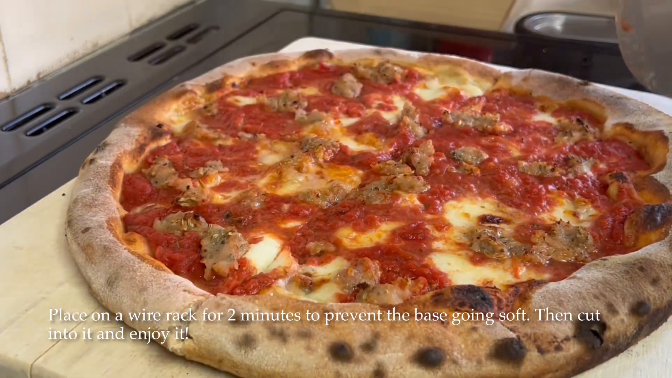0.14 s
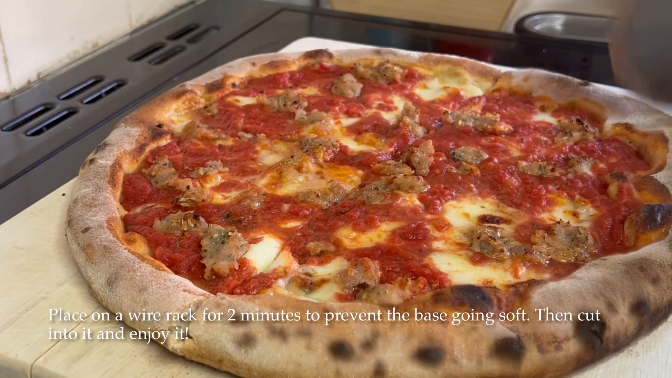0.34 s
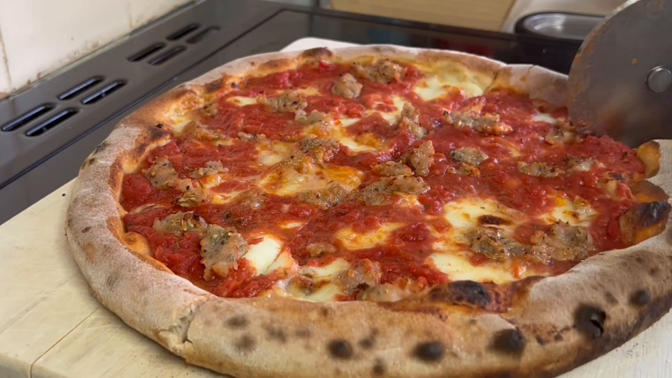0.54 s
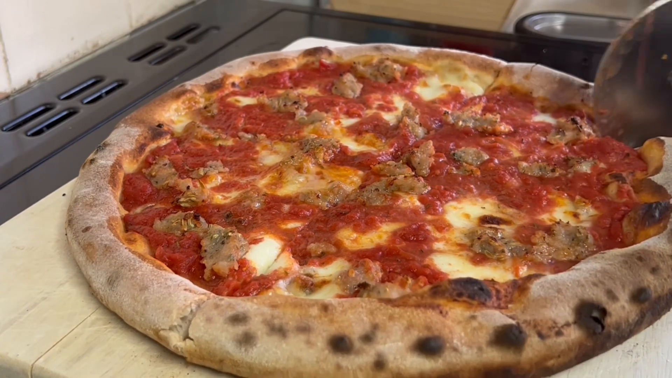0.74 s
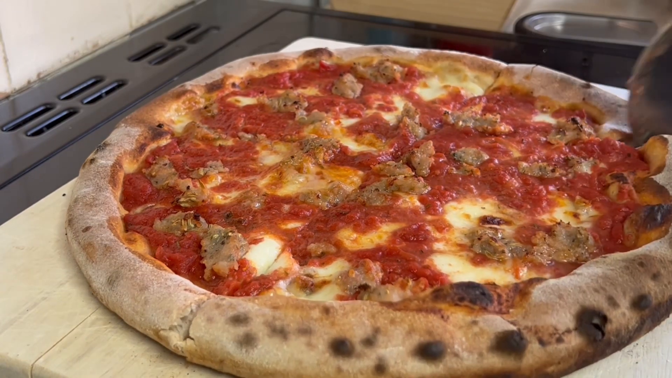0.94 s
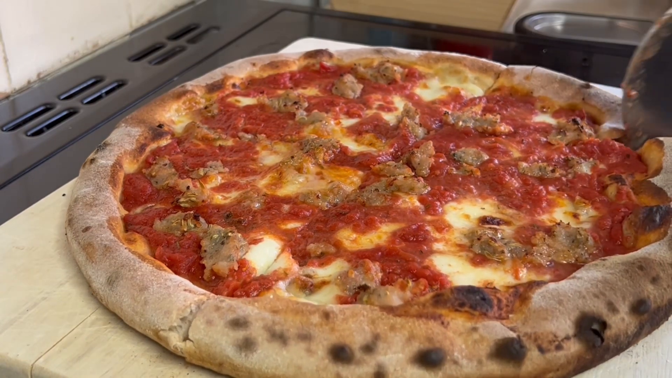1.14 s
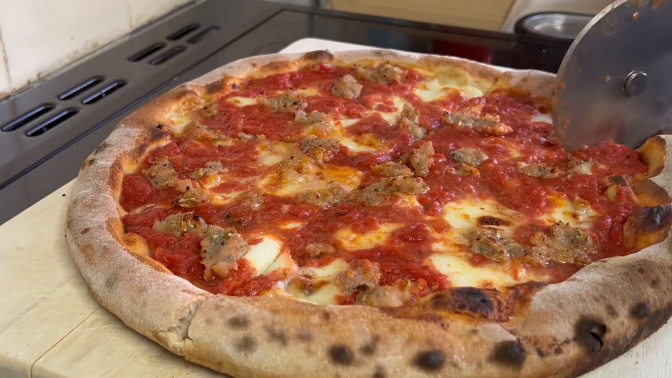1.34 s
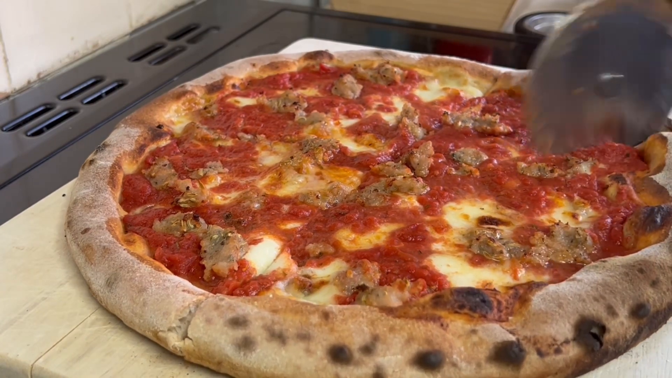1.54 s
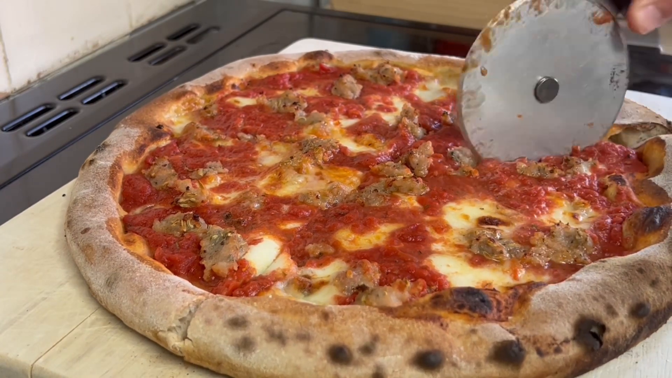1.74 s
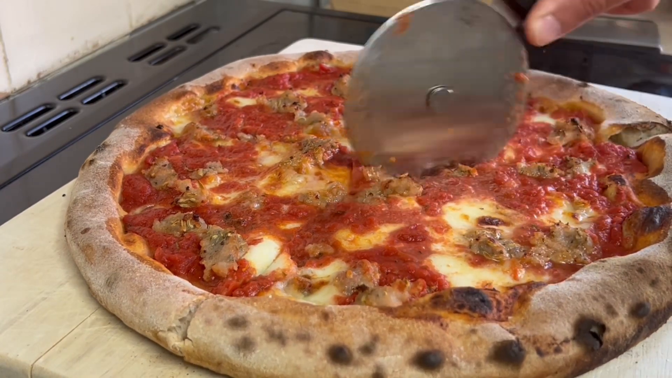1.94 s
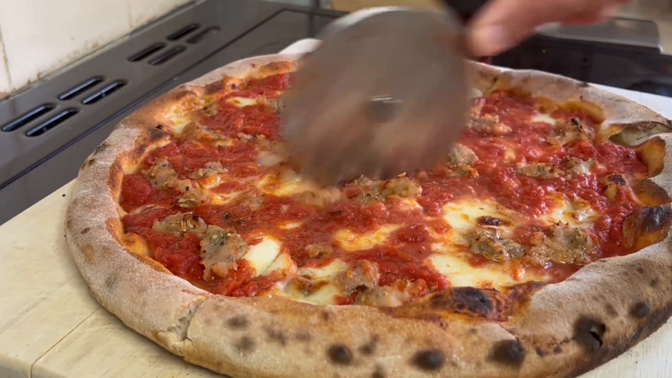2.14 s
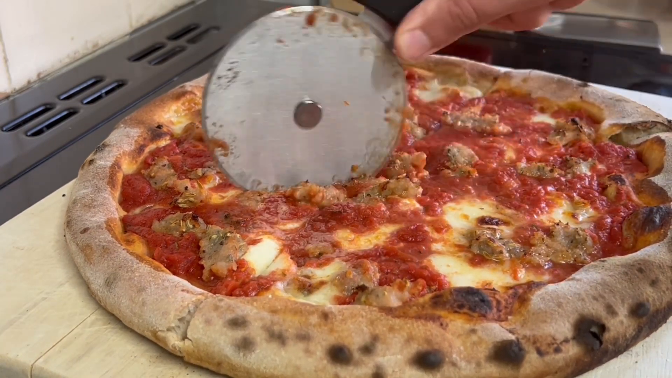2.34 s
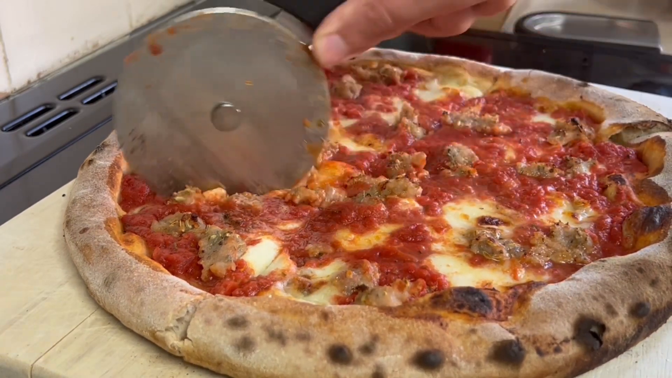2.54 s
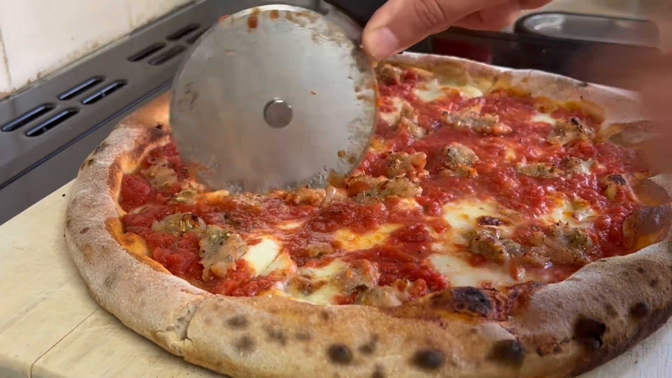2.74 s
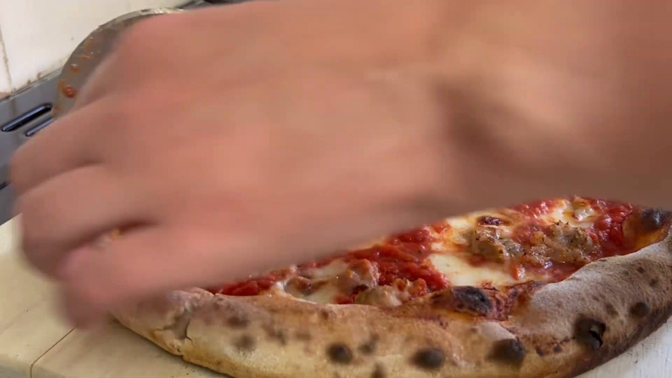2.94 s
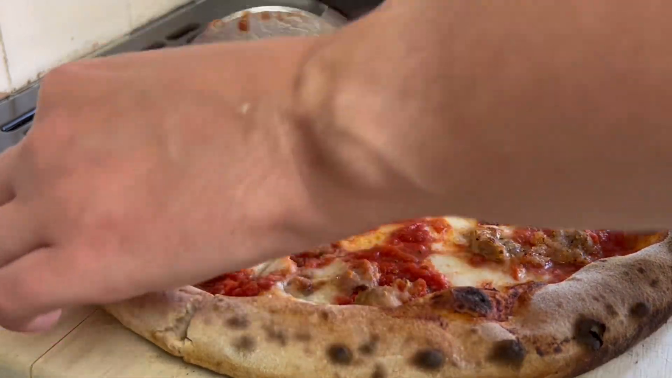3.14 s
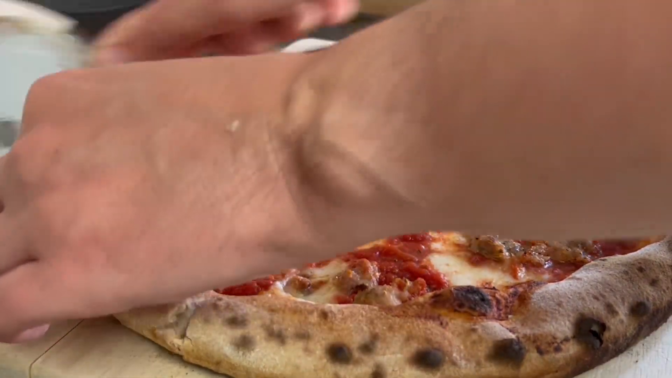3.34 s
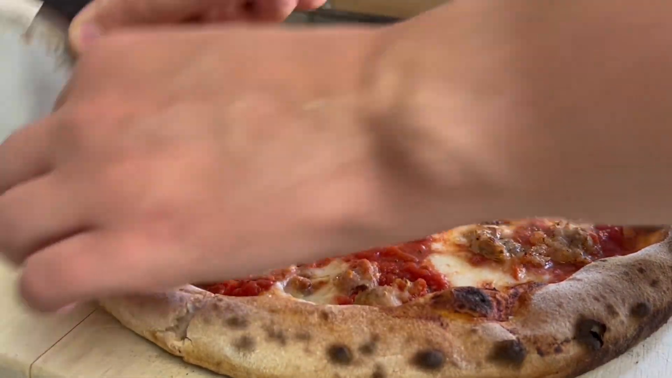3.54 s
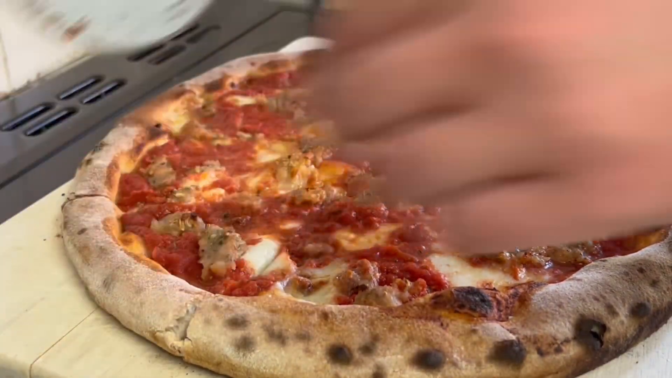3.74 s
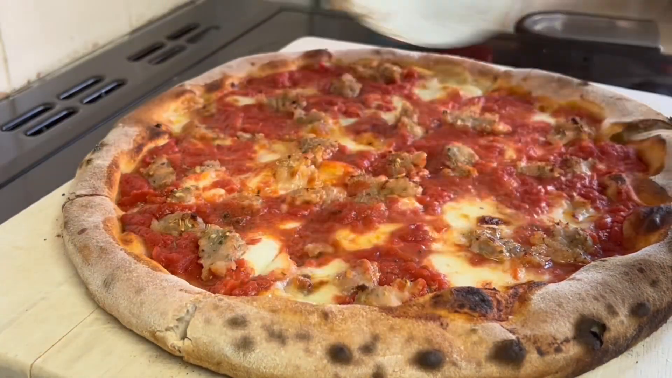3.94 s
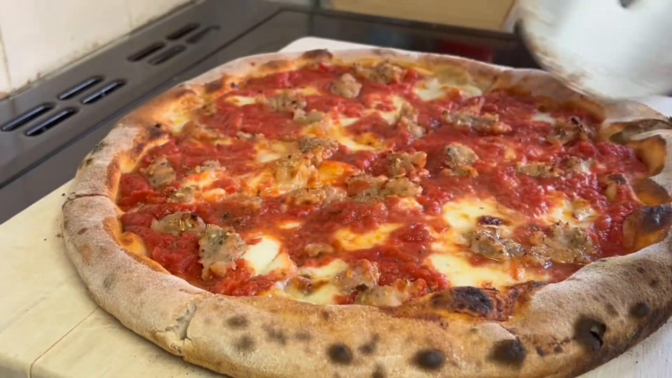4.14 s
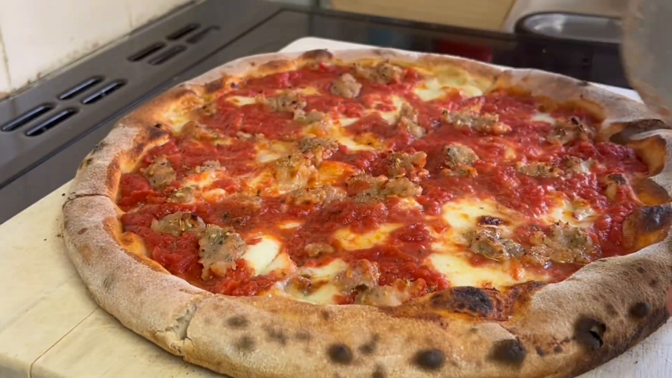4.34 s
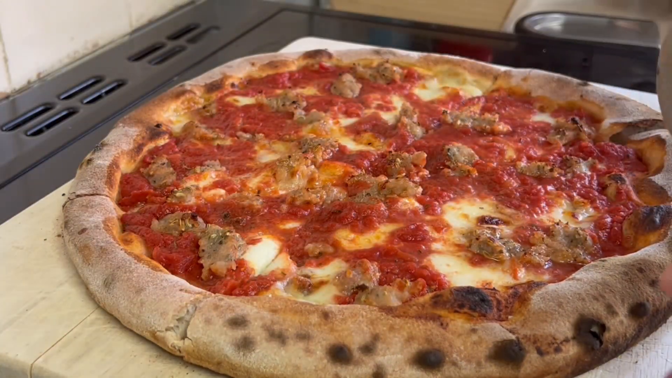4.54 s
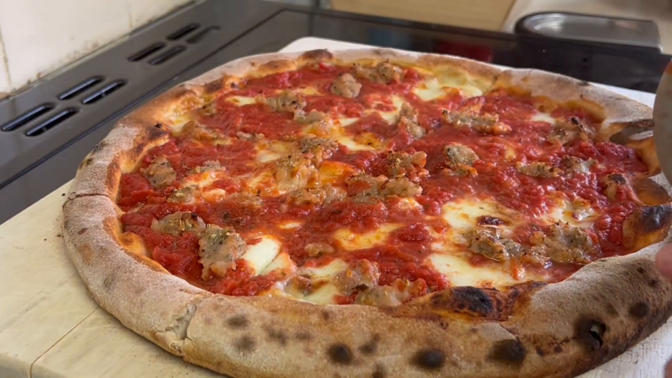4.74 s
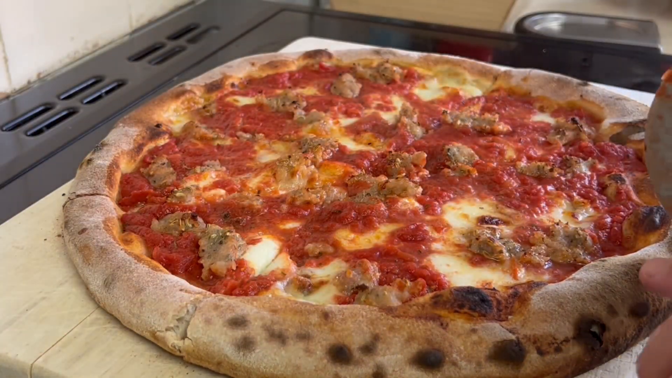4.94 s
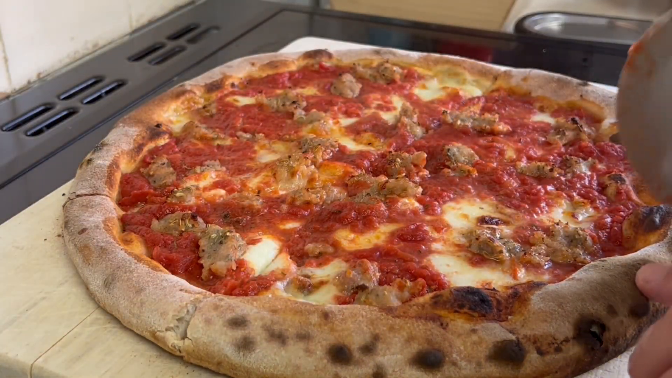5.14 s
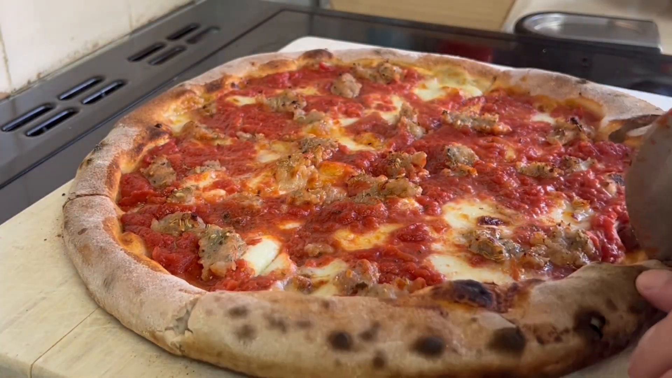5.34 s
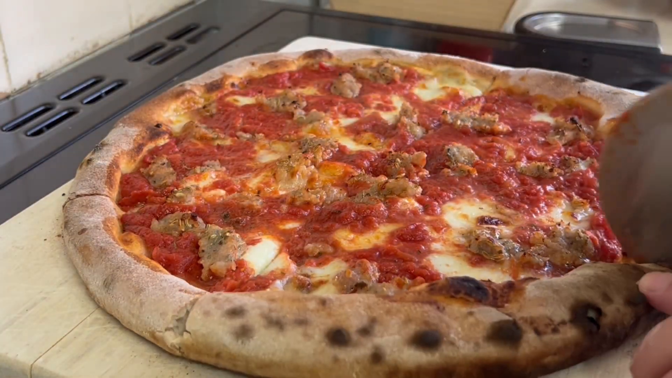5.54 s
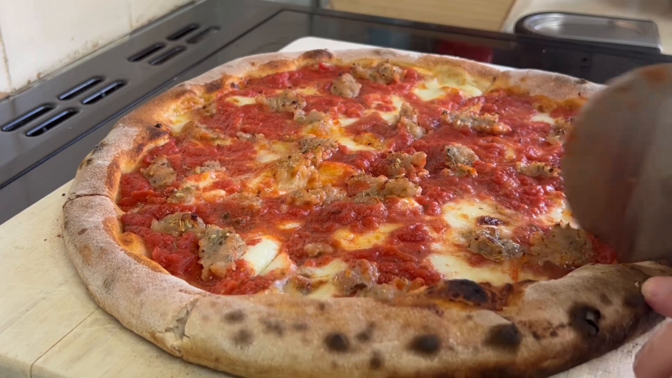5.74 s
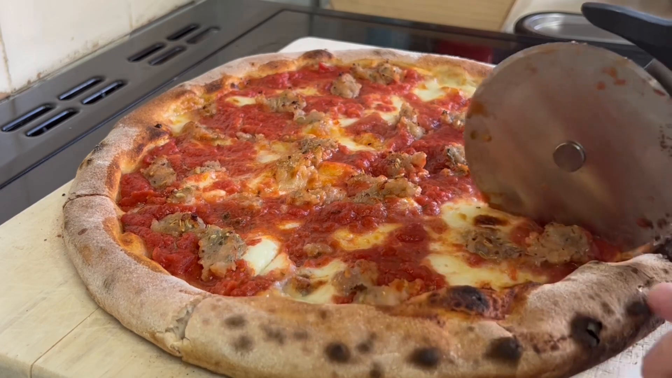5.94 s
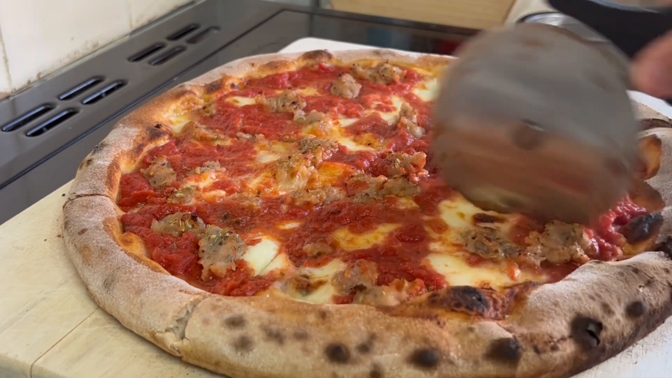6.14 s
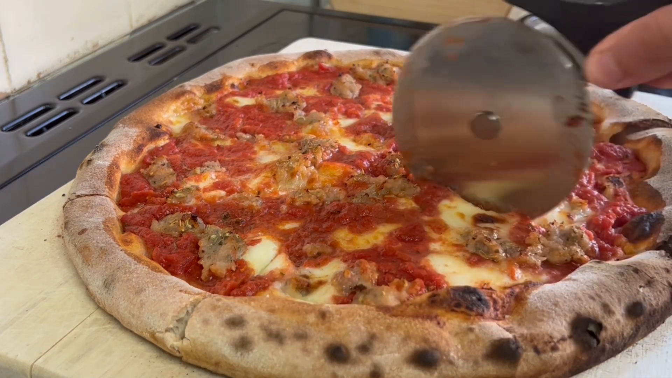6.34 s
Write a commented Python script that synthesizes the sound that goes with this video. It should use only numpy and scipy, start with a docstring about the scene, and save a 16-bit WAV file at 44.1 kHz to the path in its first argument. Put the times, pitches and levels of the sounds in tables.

```python
"""Over the hush of a small kitchen, a steel wheel cutter meets a crisp pizza on a wooden board, close by.
The loose disc ticks and sings, the rim crunches in showers of fractures, and the board knocks and rumbles.
The wheel rolls on through the thin base with a fine crackle and dull grinding, as small pockets cave in.
After the far rim the hands rustle on the handle, and a bump and a dry swish pass round the pizza.
Then comes the second cut, with another crunching rim and more crackle, ending in light clacks on the board."""
import sys
import numpy as np
from scipy import signal
from scipy.fft import rfft, irfft
from scipy.io import wavfile
from scipy.ndimage import uniform_filter1d

SR = 44100
rng = np.random.default_rng(int(sys.argv[2]) if len(sys.argv) > 2 else 0)


def output_pcm(signal):
    """Save a mono or channel-first signal as 16-bit PCM at the path in sys.argv[1].

    Samples are clipped to [-1, 1] before scaling.
    """
    pcm = np.clip(np.atleast_2d(signal).T, -1, 1) * 32767
    wavfile.write(sys.argv[1], SR, np.round(pcm).astype(np.int16))


N = 286650
TIME = np.arange(N) / SR

# Stretches of crust giving way. Each row: start in seconds, relative level in dB, rise in seconds,
# hold in seconds, t60 in seconds, relative level of the board rumble in dB.
CRUNCHES = [(0.331, -34, 0.0018, 0.015, 0.21, -30.5), (0.389, -45.5, 0.039, 0.024, 0.2, -63),
            (1.581, -55, 0.0044, 0.0081, 0.081, -47), (2.89, -45.5, 0.008, 0.007, 0.13, -39),
            (3.235, -32, 0.0047, 0.019, 0.22, -36), (3.377, -44, 0.0019, 0.009, 0.06, -39),
            (3.443, -49, 0.0093, 0.011, 0.091, -52.5), (5.161, -27.5, 0.015, 0.0055, 0.16, -41),
            (5.205, -34.5, 0.0075, 0.021, 0.053, -40), (5.254, -54, .008, 0.0087, 0.073, -39),
            (6.107, -59, 0.015, 0.043, 0.13, -54)]
# Pushes of the wheel through the base. Each row: start in seconds, rise in seconds, length in seconds,
# then the relative levels in dB of crackle, dull grinding and board rumble.
PUSHES = [(0.557, 0.059, 0.44, -70.5, -72.5, -65), (0.873, 0.041, 0.065, -59.5, -55, -53.5),
          (1.039, 0.017, 0.049, -61.5, -55.5, -55.5), (1.086, 0.072, 0.12, -58, -51, -56),
          (1.205, 0.055, 0.098, -60, -66, -55), (1.455, 0.078, 0.14, -55.5, -53.5, -60.5),
          (1.771, 0.051, 0.12, -68.5, -58.5, -57), (2, 0.021, 0.24, -75, -68.5, -61.5),
          (2.142, 0.012, 0.016, -66.5, -65, -78), (2.28, 0.056, 0.064, -84, -83, -77),
          (2.355, 0.089, 0.1, -63.5, -64, -70), (2.47, 0.026, 0.1, -84.5, -71.5, -72),
          (2.56, 0.057, 0.12, -84, -72, -57), (2.599, 0.1, 0.13, -67, -81, -65),
          (2.736, 0.06, 0.16, -64.5, -66.5, -60), (2.921, 0.051, 0.14, -72, -64.5, -64),
          (3.147, 0.14, 0.26, -61, -48.5, -59), (5.416, 0.039, 0.054, -57, -58.5, -56.5),
          (5.521, 0.014, 0.018, -59.5, -57.5, -55), (5.605, 0.03, 0.093, -67.5, -65, -63.5),
          (5.682, 0.0093, 0.092, -67, -70, -71), (5.757, 0.014, 0.094, -60.5, -58, -52),
          (5.903, 0.11, 0.13, -82.5, -79, -59.5), (6.039, 0.095, 0.12, -64.5, -59, -64.5),
          (6.341, 0.016, 0.045, -67, -73, -55), (6.406, 0.011, 0.047, -68.5, -58, -70)]
# Modes of the steel disc. Each row: pitch in Hz, relative level in dB, usual t60 in seconds.
DISC_MODES = [(970, -8, 0.017), (1425, -7, 0.04), (1850, -6.5, 0.04), (2176, -6.5, 0.07), (2770, -7, 0.03),
              (3260, -5.5, 0.12), (3370, -9, 0.07), (4370, -4, 0.024), (5300, -10, 0.08), (5520, -7.5, .12),
              (5600, -10, .08), (8130, -10, 0.09), (8280, -6, 0.1), (11250, -10, .05), (12900, -13, .07)]
# Colour of the breaking base. Each row: frequency in Hz, relative level in dB per Hz.
BASE_COLOUR = [(200, -12.5), (700, -4.5), (1300, -3), (2100, -1), (3200, -4), (4500, -5), (7000, -8.5),
               (8300, -3), (9500, -8.5), (12000, -13), (16000, -22.5)]
# Colour of dull grinding along the wood. Each row: frequency in Hz, relative level in dB per Hz.
GRIND_COLOUR = [(100, -15), (220, -7), (500, 1), (750, -9.5), (1200, -7.5), (3000, -47)]
FLUTTERS_PER_S = 130  # new random values per second in the flutter of each disc mode


def amp(db):
    """Decibels to gain."""
    return 10 ** (np.asarray(db) / 20)


def evened(x):
    """Scales to rms 1."""
    return x / np.sqrt(np.mean(x ** 2) + 1e-20)


def sized(x, db):
    """Sets the rms level of the loudest 2 ms of a hit."""
    return amp(db) * x / np.sqrt(uniform_filter1d(x ** 2, size=88).max())


def read(points, hz):
    """Reads a table on a log-frequency axis."""
    f, value = np.transpose(points)
    return np.interp(np.log(hz + 1), np.log(f + 1), value)


def add(mix, s, sound):
    """Mixes a sound in at time s."""
    part = mix[round(s * SR):][:len(sound)]
    part += sound[:len(part)]


def colour(x, points):
    """Causal minimum-phase filter with the given spectrum, so that clicks keep their attack."""
    log_gain = np.log(amp(read(points, abs(np.fft.fftfreq(4096, 1 / SR)))))
    spectrum = np.exp(np.conj(signal.hilbert(log_gain)))
    taps = np.fft.ifft(spectrum).real[:2048]
    return signal.fftconvolve(x, taps / np.linalg.norm(taps))[:len(x)]


def resonate(x, hz, width):
    """One resonance of gain 1; width is a share of its pitch."""
    q = 1 / np.clip(width, .02, 1.5)
    return signal.lfilter(*signal.iirpeak(min(hz, SR / 4), q, fs=SR), x)


def ring(modes):
    """Impulse response of a set of dying modes, energy 1."""
    t = TIME[:SR // 3]
    wave = sum(amp(db - 60 * t / t60) * np.sin(2 * np.pi * hz * t) for hz, db, t60 in modes)
    return wave / np.linalg.norm(wave)


def wander(per_s, size):
    """A random curve that takes a new value per_s times a second, 600 at most; rms 1."""
    steps = TIME[:size] * min(per_s, 600)
    return evened(np.interp(steps, np.arange(4096), rng.standard_normal(4096)))


def swell(rise, hold, t60):
    """Envelope: a straight rise, a hold, a dying tail."""
    t = TIME[:int((rise + hold + 2 * t60) * SR)]
    return np.minimum(t / rise, 1) * amp(-60 * np.maximum(t - rise - hold, 0) / t60)


def effort(strokes):
    """Force of the hand over time, a little uneven, from strokes (s, rise s, length s, dB)."""
    push_t60_s, uneven_db = 0.2, 2
    force = np.zeros(N)
    for s, rise, length, db in strokes:
        add(force, s, amp(db) * swell(rise, max(length - rise, 0), push_t60_s))
    uneven = evened(uniform_filter1d(rng.standard_normal(N), size=700))
    return uniform_filter1d(force, size=400) * amp(uneven_db * uneven)


def burst(t60):
    """A contact: a rattle of micro-impacts that dies within milliseconds."""
    t = TIME[:SR // 3]
    return rng.standard_normal(len(t)) * amp(-60 * t / t60)


def fractures(per_s, spread_db):
    """Random train of tiny breaks whose sizes spread at random; rms 1."""
    size = amp(spread_db * np.minimum(rng.exponential(1, N), 4))
    return evened(size * rng.choice([-1, 1], N) * (rng.random(N) < per_s / SR))


def flakes(per_s, spread_db, ring_s, count=24):
    """Fractures shared among flakes of many sizes, each with a brief pitch of its own; rms 1."""
    t, out = TIME[:600], np.zeros(N)
    at = np.flatnonzero(rng.random(N) < per_s / SR)
    size = amp(spread_db * np.minimum(rng.exponential(1, len(at)), 4))
    size = size * rng.choice([-1, 1], len(at))
    kind = rng.integers(0, count, len(at))
    for k, hz in enumerate(np.geomspace(400, 15000, count)):
        train = np.zeros(N)
        train[at[kind == k]] = size[kind == k]
        # ring_s is the decay constant at 1 kHz; higher flakes die sooner
        decay = np.exp(-t / (ring_s * np.sqrt(1000 / hz)))
        ping = decay * np.cos(2 * np.pi * hz * rng.uniform(.93, 1.07) * t)
        out += signal.oaconvolve(train, ping * np.sqrt(hz) / np.linalg.norm(ping))[:N]
    return evened(out)


def pair(z):
    """Makes two unrelated spectra as alike as diffuse sound is at the two microphone ports."""
    # Each row: frequency in Hz, likeness of the ports from 0 to 1.
    likeness = [(100, .98), (330, .7), (600, 0), (1500, 0), (2200, .8), (3400, .6), (4500, .93),
                (8000, .85), (11000, .5)]
    same = np.clip(read(likeness, np.linspace(0, SR / 2, z.shape[1])), -1, 1)
    return np.array([z[0], same * z[0] + np.sqrt(1 - same ** 2) * z[1]])


def air():
    """The faint steady hush of the room, as shaped noise."""
    # Each row: frequency in Hz, relative level in dB per Hz.
    hush_colour = [(12, -46), (20, -12), (98, -1), (168, -11), (204, -4), (310, -20.5), (347, -14),
                   (1370, -29), (2140, -27), (16000, -44)]
    level_db = -73.5
    z = pair(rfft(rng.standard_normal((2, N)))) * amp(read(hush_colour, np.fft.rfftfreq(N, 1 / SR)))
    return amp(level_db) * evened(irfft(z, N))


def disc(x):
    """The ring of the steel disc; dough and holder make each mode flutter on its own in level and pitch."""
    depth = 1  # flutter as a share of the mode's level
    out, energy = np.zeros(len(x)), 0
    for hz, db, t60 in DISC_MODES:
        loss = np.log(1000) / (t60 * SR)
        pole = np.exp(2j * np.pi * hz / SR - loss)
        mode = signal.lfilter([1], [1, -pole], x + 1e-18)
        flutter = 1 + depth * (wander(FLUTTERS_PER_S, len(x)) + 1j * wander(FLUTTERS_PER_S, len(x)))
        out += amp(db) * (mode * flutter).imag
        energy += amp(db) ** 2 * (1 + 2 * depth ** 2) / (4 * loss)
    return out / np.sqrt(energy)


def through_disc(x, ring_db):
    """Whatever breaks at the edge also rings the steel disc."""
    return x + amp(ring_db) * disc(x)


def axle():
    """Play in the axle lets the disc tick, and chafe with a scrape that half hides its ring."""
    # Ticks. Each row: start in seconds, relative level in dB, brightest frequency in Hz,
    # ring of the disc in dB against the click.
    ticks = [(0.281, -42.5, 1990, -18), (0.286, -34.5, 1670, -9), (0.308, -37, 1380, -6),
             (1.551, -30, 3400, -10), (1.558, -40, 3400, -5), (1.827, -40.5, 2330, -0.5),
             (1.871, -45, 3200, -8), (1.897, -44, 4000, -11), (1.967, -32, 4200, -29),
             (1.972, -22, 3320, -12.5), (2.187, -41, 2900, -7), (3.035, -45.5, 3000, -22),
             (3.482, -31.5, 1760, -13), (3.561, -51, 2090, -15), (3.8, -37, 2000, -7.5),
             (3.958, -46, 1900, -7.5), (3.978, -54, 2700, -13.5), (4.028, -37, 2335, -10.5),
             (4.041, -46, 4930, -2), (4.883, -56.5, 3450, -15.5), (4.962, -53, 3280, -13),
             (5.124, -56.5, 1520, 1), (5.143, -52, 1700, 0), (6.122, -32.5, 4200, -7)]
    # The disc chafing against its holder. Each row: start in seconds, relative level in dB, length in seconds.
    chafes = [(1.493, -52.5, 0.038), (1.829, -55, 0.066), (1.887, -59, 0.051), (2.185, -57, 0.056),
              (3.336, -53, 0.034), (3.465, -60.5, 0.054)]
    # Each row: frequency in Hz, relative level in dB per Hz.
    click_colour = [(300, -18.5), (900, -5.0), (1700, 1), (5000, -2.5), (9000, -4.0), (15000, -28)]
    out, rub = np.zeros(N), np.zeros(N)
    for s, db, hz, ring_db in ticks:
        click = colour(burst(t60=0.014), click_colour)
        click += amp(7.5) * resonate(click, hz, width=0.26)
        add(out, s, sized(through_disc(click, ring_db), db - 6.0))
    for s, db, length in chafes:
        add(rub, s, amp(db) * signal.windows.tukey(int(length * SR), .5))
    slips = rub * fractures(per_s=2500, spread_db=1.5)
    return out + amp(-1.0) * disc(slips) + amp(-5) * colour(slips, BASE_COLOUR)


def pings():
    """Where the disc is let go decides which of its modes sings out; the ring wavers as the wheel turns."""
    # The disc slipping free of the dough. Each row: start in seconds, relative level in dB,
    # pitch of the favoured mode in Hz, ring time as a multiple of the usual.
    releases = [(0.286, -50, 3260, .8), (2.188, -50, 5520, 1.3), (2.19, -53, 3260, .9),
                (2.203, -51, 2176, 1.4), (3.456, -46, 3260, .9), (3.461, -45, 5520, 1.1),
                (3.467, -38, 8280, .6), (5.345, -43, 5300, .5), (6.122, -44, 5520, .8)]
    focus_db_per_octave, flutter_depth = 32, .55
    out = np.zeros(N)
    for s, db, favoured_hz, sustain in releases:
        note = 0
        for hz, level, t60 in DISC_MODES:
            weight = amp(level - focus_db_per_octave * abs(np.log2(hz / favoured_hz)))
            mode = ring([(hz, 0, t60 * sustain)]) * np.sqrt(t60)
            note = note + weight * mode * (1 + flutter_depth * wander(FLUTTERS_PER_S, len(mode)))
        add(out, s, sized(note, db))
    return out


def rim():
    """Crust collapses in dense showers of fractures, with single flakes snapping."""
    # The loudest flakes snapping. Each row: start in seconds, relative level in dB.
    snaps = [(0.335, -19), (0.362, -20), (0.606, -43.5), (0.656, -36), (1.320, -37), (1.596, -28.5),
             (2.903, -23.5), (3.165, -43.5), (3.241, -24.5), (3.263, -25), (3.276, -24.5), (3.39, -25),
             (3.467, -43), (5.178, -16.5), (5.212, -20), (5.345, -31), (5.428, -39.5), (5.52, -37),
             (5.627, -35.5), (6.121, -24)]
    # Each row: frequency in Hz, relative level in dB per Hz.
    crust_colour = [(59, -35.5), (100, -5), (295, -4), (608, -7), (752, -9.5), (1420, -11.5), (2270, -13),
                    (5190, -11), (7140, -12), (7940, -5.5), (10000, -15.5), (11200, -10.5), (13800, -23),
                    (16000, -21)]
    force = np.zeros(N)
    for s, db, rise, hold, t60, _ in CRUNCHES:
        add(force, s, amp(db) * swell(rise, hold, t60))
    shower = fractures(per_s=4900, spread_db=4.5)
    shower = shower + amp(-2.0) * flakes(per_s=6000, spread_db=2.5, ring_s=0.0029)
    breaks = force * evened(shower)
    for s, db in snaps:
        add(breaks, s, sized(burst(t60=0.018), db - 7.5))
    return through_disc(colour(breaks, crust_colour), ring_db=-17.0)


def rumble():
    """The board shakes under every push and each time the crust gives way."""
    # Each row: frequency in Hz, relative level in dB per Hz.
    rumble_colour = [(20, -18), (40, -2), (68, 2), (100, -1.5), (130, 1), (195, -1), (280, -15), (600, -44)]
    shake_rise_s, shake_t60_s = 0.015, 0.26  # the board's own start and stop, whatever the crust does
    shake = effort((s, rise, length, db) for s, rise, length, _, _, db in PUSHES)
    for s, _, _, hold, _, db in CRUNCHES:
        add(shake, s, amp(db) * swell(shake_rise_s, hold, shake_t60_s))
    return amp(-1.5) * shake * evened(colour(rng.standard_normal(N), rumble_colour))


def knock(db, low_hz, high_hz, contact_s=.03):
    """The wheel meets the wood; dough between dulls the blow, and a light touch hardly moves the whole board."""
    # What the board rings with. Each row: pitch in Hz, relative level in dB, t60 in seconds.
    board_modes = [(68, -19, 0.09), (129, -8.5, 0.16), (165, -5, .11), (196, -3, 0.094), (252, 0.5, 0.055),
                   (330, -6, .03), (420, -7.5, 0.039), (470, -3, 0.06), (568, -6.5, 0.035),
                   (690, -3, 0.022), (810, -5, .02), (1074, -6, 0.031), (1420, -9, 0.032), (2550, 1, 0.018),
                   (3390, 1, 0.02)]
    # Colour of the contact. Each row: frequency in Hz, relative level in dB per Hz.
    contact_colour = [(40, -8.5), (200, -2), (600, 1), (1200, -7.5), (3500, -6), (8000, -10), (16000, -7)]
    rattle = colour(burst(t60=contact_s), contact_colour)
    blow = ring(board_modes) + amp(9.0) * rattle / np.linalg.norm(rattle)
    cushion = signal.butter(2, min(high_hz, SR / 3), fs=SR)
    light = signal.butter(1, low_hz, "high", fs=SR)
    return sized(signal.lfilter(*light, signal.lfilter(*cushion, blow)), db - 8.0)


def flex(db, hz):
    """The round, quickly damped note of the board bending under the wheel."""
    rise_s, t60_cycles = .002, 5.6
    shape = swell(rise_s, 0, t60_cycles / hz)
    return sized(shape * np.sin(2 * np.pi * hz * TIME[:len(shape)]), db)


def board():
    """Heavy blows after which the board drops back, and light double clacks as the edge touches, then lands."""
    # Blows that move the whole board. Each row: start in seconds, relative level in dB, lowest Hz, highest Hz,
    # pitch of the flex in Hz, relative level of the flex in dB.
    thuds = [(0.3347, -15, 203, 3000, 164, -25), (2.893, -24, 259.6, 1209, 530, -36),
             (3.233, -20.5, 170, 1560, 422, -40), (3.314, -14.5, 170, 430, 245, -15),
             (3.486, -24, 79, 138, 114, -29), (5.170, -28, 297, 1190, 267, -34)]
    # Double clacks. Each row: start in seconds, relative level of the landing in dB, gap in seconds, highest Hz,
    # touch in dB on the landing's scale, pitch of the knock in Hz, that pitch in dB on the same scale.
    clacks = [(0.333, -27, 0.0021, 3510, -1, 2560, 1), (1.9661, -22.5, 0.0066, 4540, 1, 746, -10),
              (3.312, -15.5, 0.0025, 1010, -0.5, 810, -11), (6.109, -23.5, .011, 4000, -8, 1450, -11.5),
              (6.324, -44, 0.002, 1200, -7, 752, -16), (6.348, -23.5, 0.0041, 3530, -12.5, 1135, -15.5),
              (6.425, -35.5, 0.0015, 3000, -3, 880, -10.5), (6.435, -34.5, 0.0015, 3000, -6, 1150, -18)]
    rebound_s, rebound_db, rebound_low_hz, rebound_high_hz = .024, -8.5, 130, 500
    # a hard edge leaves the wood sooner than one cushioned by dough
    clack_low_hz, clack_contact_s, tone_t60_s = 480, .013, .018
    out = np.zeros(N)
    for s, db, low_hz, high_hz, flex_hz, flex_db in thuds:
        add(out, s, flex(flex_db, flex_hz))
        add(out, s, knock(db, low_hz, high_hz))
        rebound = knock(db + rebound_db, rebound_low_hz, min(high_hz, rebound_high_hz))
        add(out, s + rebound_s, rebound)
    for s, db, gap, high_hz, touch_db, pitch_hz, tone_db in clacks:
        add(out, s, knock(db + touch_db, clack_low_hz, high_hz, clack_contact_s))
        add(out, s + gap, knock(db - 3.0, clack_low_hz, high_hz, clack_contact_s))
        add(out, s + gap, sized(ring([(pitch_hz, 0, tone_t60_s)]), db + tone_db))
    return out


def rolling():
    """The edge crackles through the thin base in clumps and grinds along the wood."""
    clump_db, clumps_per_s = 2.3, 260
    breaks = fractures(per_s=3200, spread_db=3.0)
    breaks = breaks + amp(1.5) * flakes(per_s=6000, spread_db=2.0, ring_s=0.0012)
    clumps = amp(clump_db * wander(clumps_per_s, N))
    crackle = through_disc(colour(breaks * clumps, BASE_COLOUR), ring_db=-12.0)
    grind = colour(fractures(per_s=610, spread_db=1.5), GRIND_COLOUR)
    cutting = effort((s, rise, length, db) for s, rise, length, db, _, _ in PUSHES)
    pressing = effort((s, rise, length, db) for s, rise, length, _, db, _ in PUSHES)
    return amp(5.0) * cutting * evened(crackle) + pressing * evened(grind)


def pockets():
    """Each small pocket in the base caves in as a short crunch, coloured by its hollow."""
    # Each row: start in seconds, relative level in dB, pitch in Hz, t60 of the crunch in seconds.
    hollows = [(0.905, -48, 525, 0.079), (0.962, -53, 480, 0.051), (1.005, -62, 2200, 0.045),
               (1.059, -51, 3770, 0.056), (1.112, -51, 790, 0.025), (2.431, -55, 1730, 0.073),
               (2.547, -53.5, 326, 0.22), (2.582, -57.5, 430, 0.038), (2.655, -55.5, 2230, 0.027),
               (2.841, -51, 2300, 0.024), (2.985, -56, 1700, 0.054), (5.368, -52.5, 1526, 0.011),
               (5.457, -55, 1200, 0.023), (5.499, -51.5, 950, 0.018), (5.539, -53.5, 640, 0.018),
               (5.554, -65, 1500, .02), (5.695, -65, 3400, .08), (5.772, -56, 3580, 0.054),
               (5.795, -51, 4060, 0.075), (5.815, -56, 3720, 0.11), (5.849, -50.5, 2880, 0.052),
               (5.876, -55.5, 3300, .03)]
    rise_s, width = 0.0027, 0.44  # width of each resonance as a share of the pitch
    out = np.zeros(N)
    for s, db, hz, t60 in hollows:
        shape = swell(rise_s, 0, t60)
        crunch = shape * rng.standard_normal(SR)[:len(shape)]
        hollow = resonate(resonate(crunch, hz, width), hz, width)
        add(out, s, sized(hollow, db))
    return out


def hands():
    """Fingers shift on the handle and the crust: a faint rustle of tiny slips."""
    # Changes of grip. Each row: start in seconds, rise in seconds, length in seconds, relative level in dB.
    grips = [(3.55, .05, .38, -73), (3.965, .02, .03, -62), (4.08, .05, .92, -78)]
    # Skin on the handle. Each row: frequency in Hz, relative level in dB per Hz.
    skin_colour = [(100, -16), (400, 2), (900, -6), (2000, 1.5), (3500, -4), (8000, -10.5), (15000, -27)]
    return effort(grips) * evened(colour(fractures(per_s=1900, spread_db=-4.0), skin_colour))


def slide():
    """The hand reaches round the pizza: a soft bump, then fine even friction that swells and fades."""
    # Path of the swish. Each row: time in seconds, relative level in dB.
    path = [(4.48, -78), (4.522, -66.5), (4.545, -55.5), (4.61, -49), (4.736, -50), (4.81, -57.5),
            (4.848, -74.5), (4.9, -84)]
    # One bump: start in seconds, rise in seconds, length in seconds, relative level in dB.
    bump = (4.5, 0.2, 0.27, -57)
    # Each row: frequency in Hz, relative level in dB per Hz.
    swish_colour = [(100, -9), (450, -16), (650, -15), (1170, -0.5), (2300, 0.5), (3200, 0), (4500, -5.5),
                    (6000, -6.5), (8200, -5.5), (9500, -11.5), (11000, -16), (13000, -29.5), (16000, -26.5)]
    s, db = np.transpose(path)
    force = amp(np.interp(TIME, s, db)) * (TIME > s[0]) * (TIME < s[-1])
    swish = evened(colour(fractures(per_s=20000, spread_db=0.5), swish_colour))
    return force * swish + effort([bump]) * evened(colour(rng.standard_normal(N), GRIND_COLOUR))


def worktop(x):
    """A few early echoes from the worktop and the tiled wall, a little different at each port."""
    taps = np.zeros((2, 2048))
    for side in taps:
        side[rng.integers(60, 600, size=8)] = rng.choice([-1, 1], size=8) / np.sqrt(8)
    taps = irfft(pair(rfft(taps)))[:, :1024]
    return amp(-11.0) * signal.oaconvolve(x[None], taps, axes=1)[:, :N]


def kitchen(x):
    """Dense reflections from worktop and tiles, each band dying at its own speed."""
    # Each row: frequency in Hz, t60 in seconds.
    decay = [(100, 1.28), (300, 0.32), (1000, 0.36), (4000, 0.67), (14000, 0.17)]
    # Each row: frequency in Hz, relative level of the reverberation in dB.
    wet = [(100, -5.5), (300, -11.5), (600, -3), (1500, -10.5), (5000, -19), (14000, -9.5)]
    hz, t, z = signal.stft(rng.standard_normal((2, SR)), SR, nperseg=256)
    t60 = read(decay, hz)[:, None]
    even_energy = np.sqrt(np.log(10 ** 6) / t60 / SR)  # long and short bands carry the same energy
    tail = signal.istft(z * amp(-60 * t / t60) * even_energy, SR, nperseg=256)[1][:, :SR]
    tail = irfft(pair(rfft(tail)) * amp(read(wet, np.fft.rfftfreq(SR, 1 / SR))))
    tail = tail * np.clip(TIME[:SR] / 0.00055, 0, 1)  # soft onset
    return signal.fftconvolve(x[None], tail[:, :SR * 3 // 4], axes=1)[:, :N]


def scene():
    """Cutter, crust and board in the kitchen; the slide is further off."""
    slide_direct_db, slide_room_db = -1.5, 4.5
    wheel = axle() + pings()
    pizza = rim() + rolling() + pockets()
    wood = board() + rumble()
    cut = amp(1.55) * (wheel + pizza + wood + hands())
    far = slide()
    direct = cut + amp(slide_direct_db) * far
    room = worktop(cut + far) + kitchen(cut + amp(slide_room_db) * far)
    return direct + room + air()


def record(dry):
    """A bass roll-off, two ports that drift apart in phase in the treble, then the band limit."""
    # Each row: frequency in Hz, phase lead of the left port in radians.
    lead = [(0, 0), (900, -.2), (1500, -.3), (2200, 0), (3150, .6), (4200, 0), (8700, 0), (10200, -3.14),
            (12000, -6.28), (13800, -9.42), (15500, -12.5)]
    # Each row: frequency in Hz, left level over right in dB.
    balance = [(60, 0.81), (200, 1.2), (600, 0.45), (2000, 0.22), (16000, 0.16)]
    low_cut_hz, edge_hz = 42, 16200
    hz = np.fft.rfftfreq(N, 1 / SR)
    dry = signal.lfilter(*signal.butter(2, low_cut_hz, "high", fs=SR), dry)
    lean = amp(read(balance, hz) / 2)
    ports = irfft(rfft(dry) * np.array([lean, np.exp(-1j * read(lead, hz)) / lean]), N)
    band_limit = signal.firwin(511, edge_hz, window=("kaiser", 9), fs=SR)
    return signal.oaconvolve(ports, band_limit[None], "same")


dry = scene()
out = record(dry)
output_pcm(out)
```